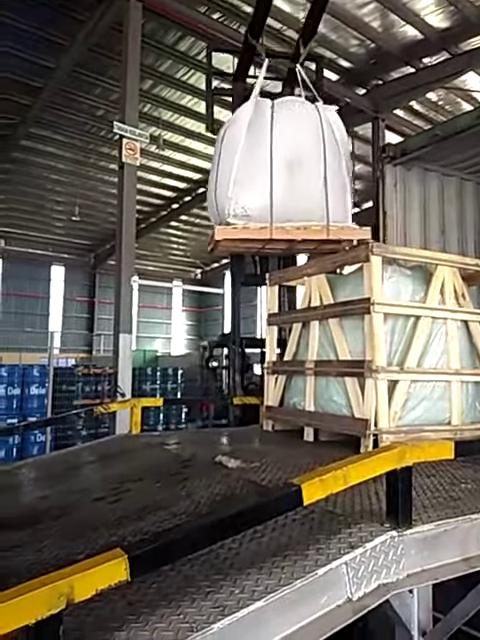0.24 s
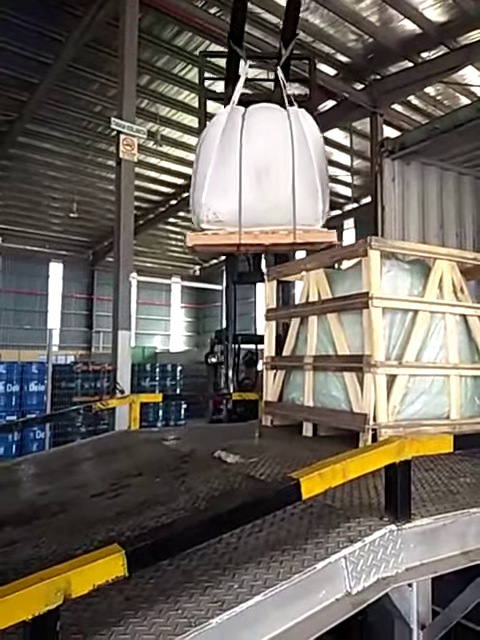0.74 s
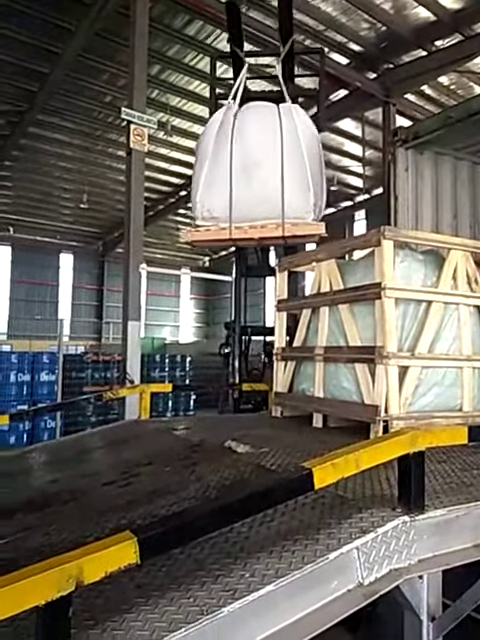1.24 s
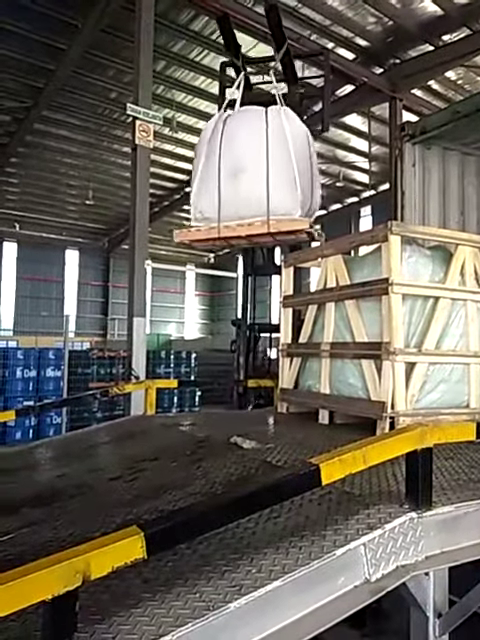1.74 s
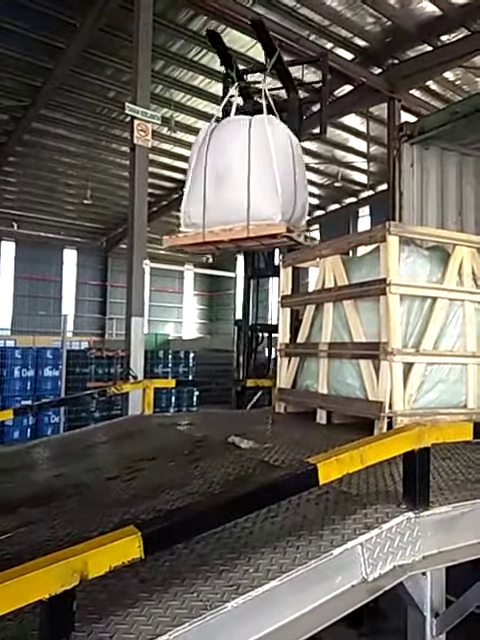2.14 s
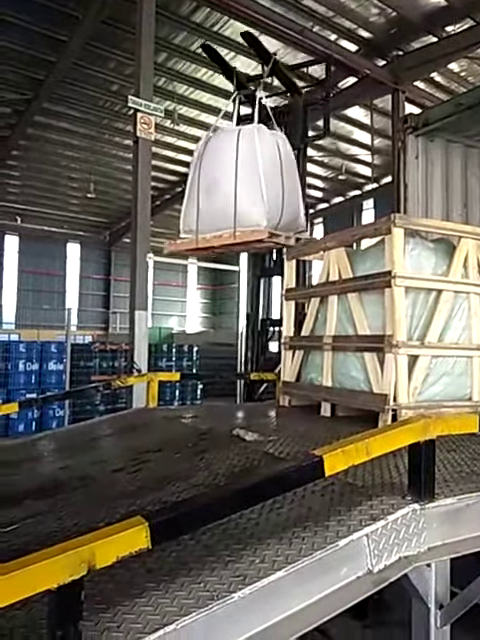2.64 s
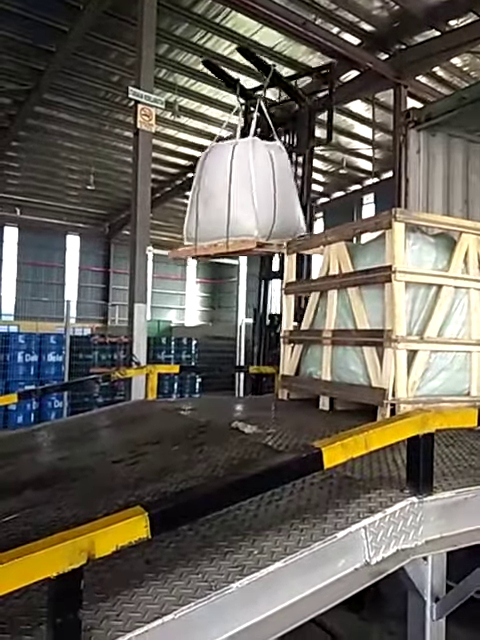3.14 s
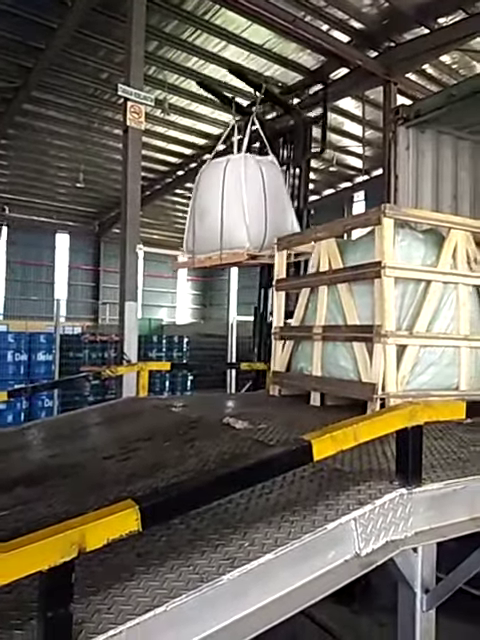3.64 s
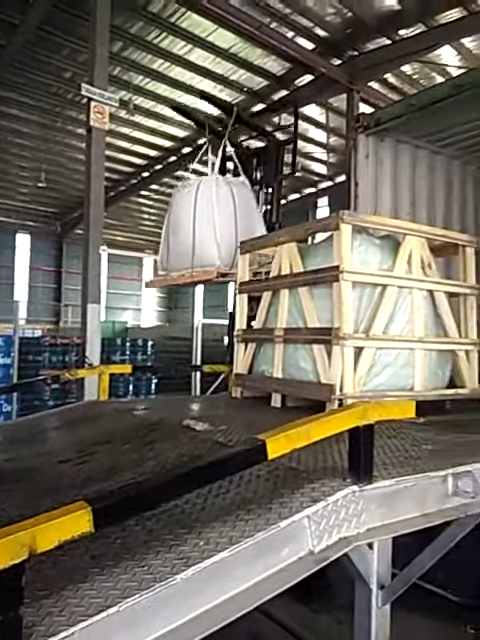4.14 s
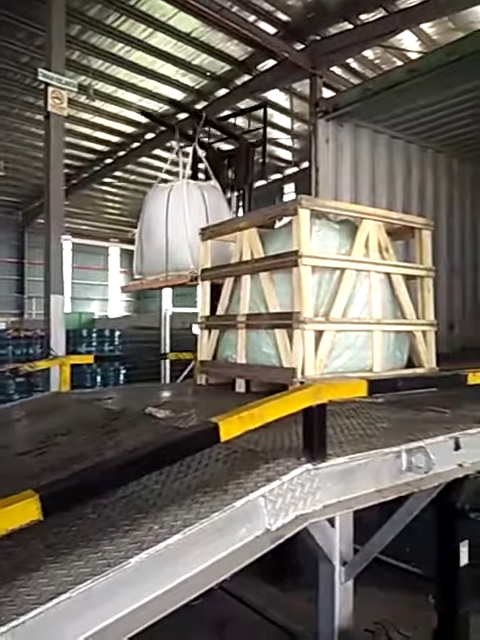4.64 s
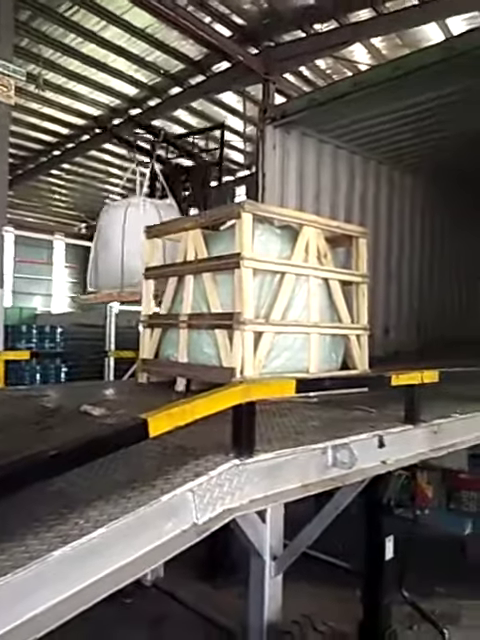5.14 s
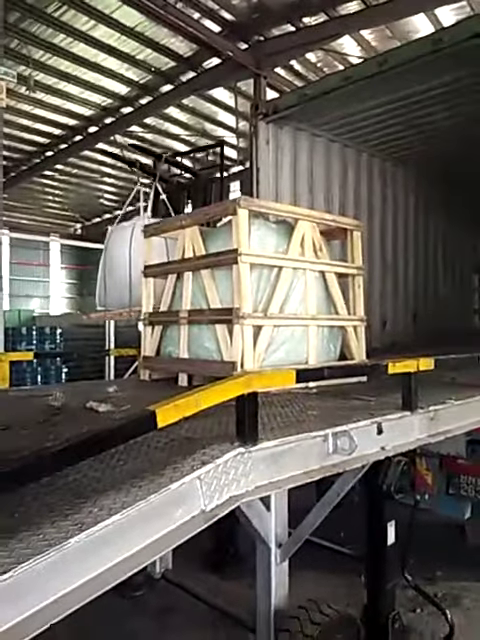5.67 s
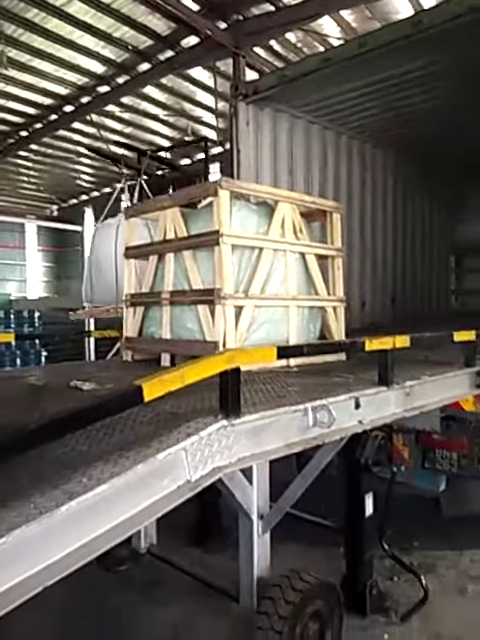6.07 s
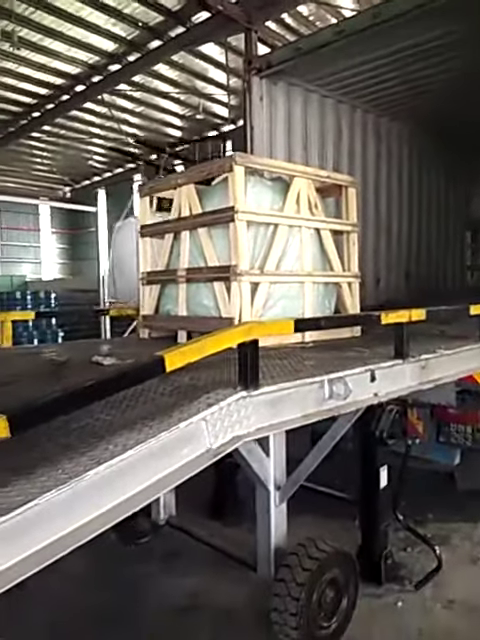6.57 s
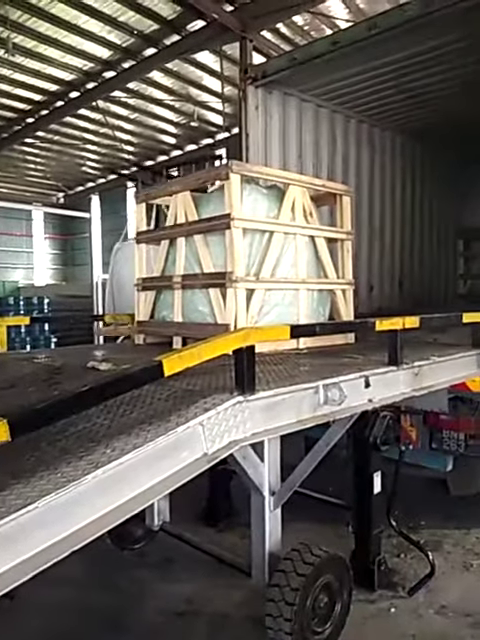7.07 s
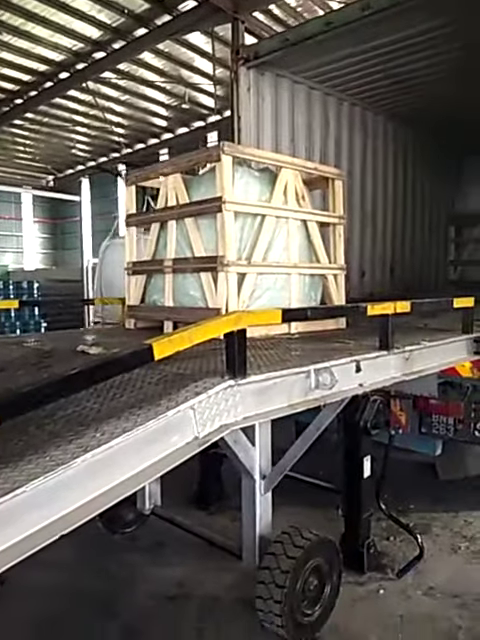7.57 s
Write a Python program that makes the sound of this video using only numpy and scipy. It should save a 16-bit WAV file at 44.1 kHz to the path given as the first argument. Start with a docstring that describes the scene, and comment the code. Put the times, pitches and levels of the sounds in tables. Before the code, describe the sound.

Low, uneven forklift chugging and motor hum fill an echoing metal hall, with short pump whines, light rattles, then thin brake squeaks midway.

```python
"""In a big metal warehouse a forklift works at low revs, heard through the two ports of a phone.
Its firing rate sags and recovers; shaft harmonics form the engine notes, a tooth tone the hydraulic whine,
and noise puffs at each firing the exhaust. Parked engines idle, motors hum on and off, resonances whirr,
a mast rattles, the tailpipe throbs and a brake squeaks as sliding notes.
Filtered noise fills the hall with a broad roar, almost mono in the bass and wide in the treble."""
import sys
import numpy as np
from scipy import signal
from scipy.fft import rfft, irfft, next_fast_len
from scipy.io import wavfile
from scipy.ndimage import uniform_filter1d, map_coordinates

SR = 44100
rng = np.random.default_rng(int(sys.argv[2]) if len(sys.argv) > 2 else 0)


def dump(signal):
    """Clip the signal to [-1, 1] and save it as 16-bit WAV at the path in sys.argv[1]."""
    limited = np.clip(np.atleast_2d(signal).T, -1, 1)
    pcm = np.round(limited * 32767).astype(np.int16)
    wavfile.write(sys.argv[1], SR, pcm)


N = 344283
T = np.arange(N) / SR  # time [s]
M = next_fast_len(N, True)  # transform length [samples]
F = np.maximum(np.arange(M // 2 + 1) * SR / M, 1.)  # bin frequencies [Hz], kept above 0 for logarithms
LEFT_RIGHT = np.array([[1], [-1]])  # opposite signs for the two ports


def undb(db):
    """Decibel law: level to amplitude gain."""
    return np.exp(np.asarray(db) * (np.log(10) / 20))


def unit(x):
    """Normalisation: scaled to rms 1."""
    return x / np.sqrt(np.mean(x ** 2))


def curves(table):
    """Linear interpolation: columns of a time table, one value per sample."""
    s, *columns = np.transpose(table)
    return [np.interp(T, s, c) for c in columns]


def over_hz(table):
    """Interpolation in log frequency: a (frequency, value) table on the spectrum's bins."""
    hz, value = np.transpose(table)
    return np.interp(np.log(F), np.log(hz), value)


def walk(rate):
    """Smooth random modulation: rate new values a second joined by cubics; spread near 1."""
    knots = rng.standard_normal(int(N / SR * rate) + 4)
    coarse = map_coordinates(knots, [1 + T[::32] * rate], order=3)
    return np.repeat(coarse, 32)[:N]


def held(start, length, fade_db_s):
    """Exponential fades: a dB shape that rises before the start, holds at 0 and falls after the end."""
    return -fade_db_s * np.maximum(np.maximum(start - T, T - start - length), 0)


def noise():
    """White noise: a fresh spectrum, equal power at every frequency on average."""
    return rfft(rng.standard_normal(M))


def back(spectrum):
    """Inverse Fourier transform: spectrum to sound."""
    return irfft(spectrum, M)[..., :N]


def band(hz, width_hz):
    """Resonance: noise through one bell-shaped peak, at rms 1."""
    peak = 1 / (1 + ((F - hz) / (width_hz / 2)) ** 2)
    return unit(back(noise() * peak))


def tone(hz, db, waver_db, drift_hz):
    """Interference: a sine whose level and pitch waver as the hall's echoes shift."""
    phase = 2 * np.pi * (np.cumsum(hz + drift_hz * walk(3)) / SR + rng.random())
    return np.sqrt(2) * undb(db + waver_db * walk(2.556)) * np.sin(phase)


def engine(hz, orders, waver_db, unsteady):
    """Harmonic orders of one shaft rate; the speed hunts a little, so the upper ones blur and waver more."""
    hz = hz * (1 + unsteady * walk(4.08))
    return sum(tone(k * hz, db, waver_db * min(k / 6, 1), 0.096) for k, db in orders)


# likeness of the two ports: (frequency [Hz], correlation [0-1])
LIKENESS = [(60, 0.97), (130, 0.98), (290, 0.92), (500, 0.82), (800, 0.78), (1100, 0.16), (1400, 0),
            (2500, 0.37), (4000, 0.1), (7000, 0)]


def wide():
    """Diffuse-field coherence: noise for two ports, alike in the bass, mostly unrelated in the treble."""
    alike = np.clip(over_hz(LIKENESS), 0, 1)
    common = np.sqrt(1 + alike) * noise()
    opposed = np.sqrt(1 - alike) * noise() * LEFT_RIGHT
    return common + opposed


# forklift firing rate, sagging under load and overshooting as it frees: (time [s], rate [Hz])
REVS = [(0, 30.55), (1.2, 30.61), (2.4, 30.37), (4.3, 29.36), (5.2, 30.97), (6, 31.39), (6.8, 30.79),
        (7.81, 30.44)]
# columns of the three lists below: (rumble, middle, hiss, tilt of the top octave)
REVS_DB_PER_HZ = [0.27, 0.53, 0.42, 0]  # change with firing rate [dB per Hz]
TURN_DB = [0, 3, 0.5, -4.5]  # change over the whole turn of the phone [dB]
FACING_DB = [-0.17, -0.7, 0.45, 3]  # before the turn, with the engine at IDLE_HZ [dB]
TURN_START_S, TURN_END_S, IDLE_HZ = 3.9, 8.3, 31


def swells():
    """Linear level law: rumble, middle, hiss and top tilt follow the revs and the turn of the phone."""
    turned = np.clip((T - TURN_START_S) / (TURN_END_S - TURN_START_S), 0, 1)
    faster_hz = curves(REVS)[0] - IDLE_HZ
    columns = zip(FACING_DB, TURN_DB, REVS_DB_PER_HZ)
    return [facing + turn * turned + revs * faster_hz for facing, turn, revs in columns]


# colour of the low and high roar: (frequency [Hz], relative level [dB per Hz])
RUMBLE = [(30, -45), (45, -32), (65, -10), (85, -2), (120, -2.5), (210, 0), (260, -2), (340, -13.5),
          (420, -12), (520, -18), (700, -18), (1000, -34), (1300, -39), (3000, -85)]
HISS = [(500, -13), (1100, -7.5), (1600, -2.5), (2300, -1), (3300, -4), (4100, -4.5), (4500, -11.5),
        (5800, -12), (6100, -17.5), (6800, -18), (7200, -36), (10500, -29.5), (13500, -20), (15600, -31)]
RUMBLE_DB, HISS_DB = -34.5, -36  # before the swells
# narrow peaks in the roar: (frequency [Hz], width [Hz], level before the swells [dB])
RING = [(933, 154, -50), (888, 54, -54.5), (537, 38, -53), (485, 38, -54.5), (1330, 53, -54.5),
        (2480, 130, -54.5), (3890, 120, -58), (8280, 1200, -70.5)]


def roar():
    """Band-wise modulation: noise bands flicker, the bass in shared surges, the treble most of all."""
    rumble_db, middle_db, hiss_db, tilt_db = swells()
    low, high = (unit(undb(over_hz(t))) for t in (RUMBLE, HISS))
    colour = np.hypot(undb(RUMBLE_DB) * low, undb(HISS_DB) * high)
    for hz, width_hz, db in RING:
        peak = unit(1 / (1 + ((F - hz) / (width_hz / 2)) ** 2))
        colour = np.hypot(colour, undb(db) * peak)
    pair = wide() * colour / np.sqrt(2)
    # third octaves in the bass, evenly spaced bands above
    centres = np.r_[25 * 2 ** (np.arange(0, 17) / 3), np.arange(1300, 4000, 400), np.arange(4100, 16400, 700)]
    place = np.interp(F, centres, np.arange(len(centres)))
    out, shared, surge = 0, walk(24), walk(14)
    for k, hz in enumerate(centres):
        # neighbouring bands cross over so that their gains add to 1
        part = back(pair * np.cos(np.pi / 2 * np.clip(place - k, -1, 1)) ** 2)
        treble = np.clip(np.log2(hz / 3000) / 1.8, 0, 1)
        if hz < 600:
            db = rumble_db
        elif hz < 1500:
            db = middle_db
        else:
            db = hiss_db + tilt_db * np.clip(np.log2(hz / 12500) * 4, -.4, 1) * (hz > 9000)
        if hz > 1000:  # each port flickers on its own
            own = (1.65 + 1.43 * treble) * np.array([walk(48), walk(48)])
        else:
            own = 1.5 * walk(12) + .7 * surge
        slow = (.8 if hz < 1500 else .35) * walk(1.48)
        out = out + part * undb(db + slow + own + 0.39 * treble * shared)
    return out


# colour of the tailpipe thud and silencer gurgle: (frequency [Hz], relative level [dB per Hz])
THUD = [(60, -53), (100, 2.5), (220, 0), (320, -4), (450, -48), (1500, -90)]
GURGLE = [(240, -35), (320, -1), (550, -4), (750, -5.5), (1000, -26), (1400, -37), (3000, -90)]
THUD_DB, GURGLE_DB = -40, -46.5
CHUG_SPREAD_DB, CHUG_SHARE = 6, 0.26  # unevenness of firings; decay as a share of the firing period


def chug(hz, colour, db):
    """Pulsed flow noise: a puff at each firing; strong and weak firings come in uneven runs."""
    cycles = np.cumsum(hz) / SR
    strength = np.tanh(np.convolve(rng.standard_normal(400), [.25, .9, .25], "same"))
    puffs = undb(CHUG_SPREAD_DB * strength[cycles.astype(int)]) * np.exp(-(cycles % 1) / CHUG_SHARE)
    puffs = uniform_filter1d(puffs, size=260)  # rounds the onsets
    return undb(db) * unit(puffs * back(wide() * undb(over_hz(colour))))


# spread of the echo patches: (frequency [Hz], spread [dB])
PATCHES = [(60, -1), (250, 3), (600, 5), (1000, 3.5), (1600, 4), (3000, 1.1), (5000, 3.5), (8000, 5),
           (12000, 3.5), (15500, 3.5)]


def patchy(x):
    """Echo interference: narrow patches, some 40 Hz by 40 ms, brighten and hollow; alike in the bass."""
    hz, _, cells = signal.stft(x, SR, nperseg=2048, noverlap=1536)
    field = uniform_filter1d(rng.standard_normal(cells.shape), size=2, axis=1)
    field = uniform_filter1d(field, size=3, axis=2)
    field[1, hz < 1100] = field[0, hz < 1100]  # both ports share the bass patches
    patch_hz, patch_db = np.transpose(PATCHES)
    spread_db = np.interp(np.log(hz + 1), np.log(patch_hz), patch_db)[:, None]
    gain = undb(spread_db * unit(field))
    gain /= np.sqrt(np.mean(gain ** 2, axis=2, keepdims=True))
    return signal.istft(cells * gain, SR, nperseg=2048, noverlap=1536)[1][:, :N]


# forklift engine: (multiple of the firing rate, level [dB])
LIFT_ORDERS = [(1, -74), (2, -50), (3, -49), (4, -56.5), (5, -53.5), (6, -61), (7, -50), (8, -70),
               (9, -57.5)]
# hydraulic pump working: (start [s], length [s], whine level [dB])
PUMP_RUNS = [(0, 0.56, -56), (.85, 0.29, -49.5), (1.3, 0.84, -47.5), (2.46, 0.39, -48),
             (5.052, 0.78, -53.5), (6.6, 0.54, -53)]
PUMP_TEETH, PUMP_FADE_DB_S = 15, 88  # tooth meshes per firing; fade [dB per s]


def forklift():
    """Harmonic and tooth-meshing tones: firing orders, pump whine and its octave; exhaust puffs apart."""
    hz, = curves(REVS)
    pump_db = np.max([db + held(s, length, PUMP_FADE_DB_S) for s, length, db in PUMP_RUNS], axis=0)
    teeth_hz = PUMP_TEETH * hz * (1 + .009 * walk(30))
    whine = tone(teeth_hz, pump_db + 4 * walk(14), 1.5, 1)
    octave = tone(2 * teeth_hz, pump_db - 14, 1.5, 3.52)
    puffs = chug(hz, THUD, THUD_DB) + chug(hz, GURGLE, GURGLE_DB)
    return engine(hz, LIFT_ORDERS, 3.9, 0.0033) + whine + octave, puffs


# two parked engines: (multiple of the crank rate, level [dB])
TRUCK_ORDERS = [(4, -57), (6, -51), (8, -49), (12, -51.5), (14, -53.5), (15, -72), (16, -54.5), (20, -58.5)]
IDLER_ORDERS = [(5, -51.5), (8, -46), (10, -64), (16, -49.5), (18, -59.5)]
TRUCK_HZ, IDLER_HZ = 14.98, 15.31  # mean crank rates


def parked_engines():
    """Harmonic series: two idling engines sound multiples of nearly equal crank rates."""
    truck = engine(TRUCK_HZ, TRUCK_ORDERS, 2.7, 0.001)
    idler = engine(IDLER_HZ, IDLER_ORDERS, 1.6, 0.0012)
    return truck + idler


# motor hums: (start [s], length [s], pitch [Hz], glide [Hz per s], level [dB])
HUMS = [(0, 4.2, 133.4, 0.19, -42), (4.5, 3.6, 134.9, .1, -39), (0.5, 4, 44.5, 0.13, -55.5),
        (5, 4.01, 44.6, -0.11, -50), (-0.5, 1.49, 74.5, 1.1, -57), (0, 1.1, 105.5, -0.96, -41.5),
        (1, 0.5, 88, -0.38, -58), (5, 1.39, 105, -1.23, -50)]
HUM_FADE_DB_S = 30


def hums():
    """Pure tones: motor hums that come and go, each gliding slowly and throbbing irregularly."""
    out = 0
    for s, length, hz, glide, db in HUMS:
        level_db = db + held(s, length, HUM_FADE_DB_S) + 1.3 * walk(9)
        out = out + tone(hz + glide * (T - s), level_db, 0.31, 0.09)
    return out


# narrow rough whirrs: (start [s], length [s], frequency [Hz], width [Hz], level [dB])
WHIRRS = [(.1, 0.57, 547, 61, -48), (1.105, 0.62, 954, 60, -52.5), (1.25, .8, 214.4, 12, -40),
          (2.05, 0.22, 553, 17, -47.5), (3, 0.37, 433, 89, -57), (3.05, 0.35, 205, 16, -46),
          (5.1, .5, 482, 68.6, -50.5), (6.95, 0.32, 526, 51, -53), (7.15, 0.33, 219, 27, -38),
          (7.098, 0.63, 302, 45, -43.5)]
WHIRR_FADE_DB_S = 69


def whirrs():
    """Resonance: noise in narrow peaks that come and go."""
    return sum(undb(db + held(s, length, WHIRR_FADE_DB_S)) * band(hz, width_hz)
               for s, length, hz, width_hz, db in WHIRRS)


# mast knocks: (time [s], level before the ring's own level [dB])
RATTLES = [(.12, -46), (.5, -49), (1.05, -53), (1.75, -41.5), (2.279, -45), (2.74, -47)]
# ring of the mast: (frequency [Hz], width [Hz], relative level [dB])
MAST = [(1490, 120, -12), (1810, 370, 5)]
MAST_RISE_S, MAST_T60_S = 0.0043, 0.94  # T60: time to fall 60 dB in the hall


def rattles():
    """Reverberant decay: far metal knocks, heard as short swells of the mast's ring."""
    shape = 0
    for s, db in RATTLES:
        rise = np.clip((T - s) / MAST_RISE_S, 0, 1)
        shape = shape + undb(db) * rise * undb(-60 * np.clip(T - s, 0, 9) / MAST_T60_S)
    ring = [sum(undb(db) * band(hz, width_hz) for hz, width_hz, db in MAST) for _ in range(2)]
    return shape * np.array(ring)


# the hardest exhaust throbs: (time [s], level before THROB_DB is added [dB], pitch [Hz])
THROBS = [(0.898, -24.5, 241), (1.397, -16, 146), (1.769, -20, 207), (1.799, -17, 130), (1.903, -19, 141),
          (2.574, -20, 138.3), (3.461, -23, 118), (4.366, -22, 151), (4.49, -21, 140), (4.55, -20.5, 135),
          (4.678, -23, 130), (4.855, -23.5, 212), (4.945, -16, 139), (5.068, -18, 220), (5.298, -18, 131.5),
          (5.568, -17, 126), (5.64, -21, 130), (5.78, -20, 130), (6.091, -21, 137), (6.411, -17.5, 189),
          (6.779, -17.5, 123), (6.903, -19, 253), (6.979, -22, 128), (7.022, -28, 137.2),
          (7.251, -17.5, 141.7), (7.279, -18, 210), (7.441, -27, 145.3), (7.599, -26, 136),
          (7.727, -18, 140)]
THROB_RISE_S, THROB_FALL_S, THROB_DB = 0.0055, 0.0072, -8


def throbs():
    """Damped oscillation: short low thumps, a cycle or two of the tailpipe's ring."""
    out, late = np.zeros(N + SR), T[:SR // 10]
    shape = late / THROB_RISE_S * np.exp(1 - late / THROB_FALL_S)
    for s, db, hz in THROBS:
        out[int(s * SR):][:len(late)] += undb(db + THROB_DB) * shape * np.sin(2 * np.pi * hz * late)
    return out[:N]


# brake squeaks: (start [s], length [s], pitch [Hz], glide [Hz per s], jitter spread [Hz], level [dB])
SQUEAKS = [(4.17, .22, 3165, 20, 25, -47), (4.52, .3, 3165, 30, 25, -45.5), (4.95, .17, 3185, -60, 25, -45),
           (5.13, .2, 3265, -200, 30, -46.5), (5.21, .09, 2970, -1000, 55, -44.5),
           (5.29, .1, 2885, -250, 45, -43.5), (5.44, .26, 3215, -220, 35, -44.5),
           (5.44, .34, 2875, 50, 30, -48), (5.9, .16, 3190, 0, 25, -49), (5.84, .14, 2990, -100, 40, -48)]
SQUEAK_ATTACK_S, SQUEAK_T60_S = .018, .4
SQUEAK_PAN_DB = -1  # left minus right: the brake is a little off to the right, before the port response


def squeaks():
    """Stick-slip: brake notes slide, jitter and flutter, with a hall tail; each port has its own echo mix."""
    out = np.zeros((2, N))
    for s, length, hz, glide, jitter_hz, db in SQUEAKS:
        tail = undb(-60 * np.clip(T - s - length, 0, 9) / SQUEAK_T60_S)
        shape = np.clip((T - s) / SQUEAK_ATTACK_S, 0, 1) * tail
        sliding_hz = hz + glide * np.clip(T - s, 0, length)
        notes = [tone(sliding_hz + jitter_hz * walk(300), db + 3.5 * walk(24), .5, 3.0) for _ in range(2)]
        out += shape * np.array(notes)
    return out * undb(SQUEAK_PAN_DB / 2 * LEFT_RIGHT)


def scene():
    """Superposition: all sources add at the two ports."""
    lift, puffs = forklift()
    centred = lift + parked_engines() + hums() + throbs() + whirrs()
    return centred + squeaks() + rattles() + patchy(puffs + roar())


# port response: (frequency [Hz], left minus right [dB])
PORTS = [(60, -.5), (380, -.5), (700, 0), (1100, 1.5), (1500, 4.5), (2400, 9.5), (3600, 6.5), (4500, 3.5),
         (6000, 2.5), (7400, 7), (10000, 8.5), (12000, 7.5), (13500, 9), (15300, 21)]
RIGHT_LAG_S = 6e-5  # the left port is a little nearer the engines
TOP_HZ = 15540


def record(dry):
    """Level and arrival-time differences: the left port is brighter and slightly early; the top is cut."""
    balance = undb(over_hz(PORTS) / 2 * LEFT_RIGHT)
    lag = np.exp(-2j * np.pi * F * RIGHT_LAG_S * np.array([[0], [1]]))
    ports = back(rfft(dry, M) * balance * lag)
    top_cut = signal.ellip(16, .3, 80, TOP_HZ, fs=SR, output="sos")
    return signal.sosfilt(top_cut, ports)


dry = scene()
out = record(dry)
dump(out)
```